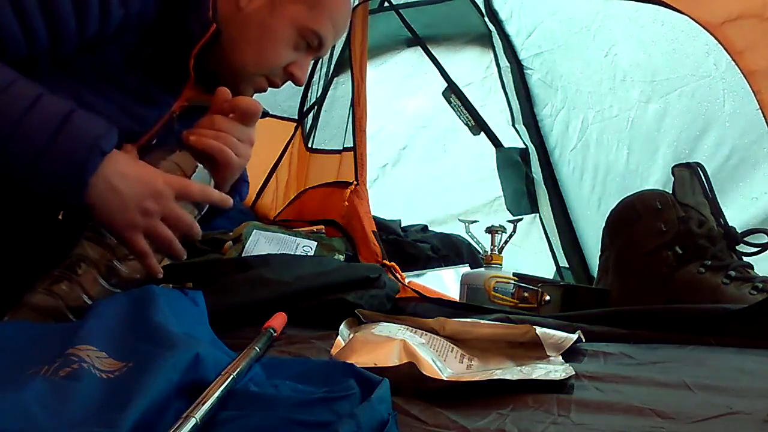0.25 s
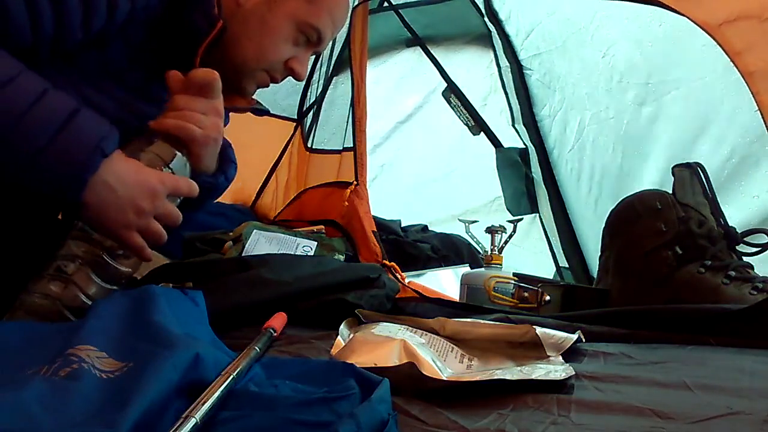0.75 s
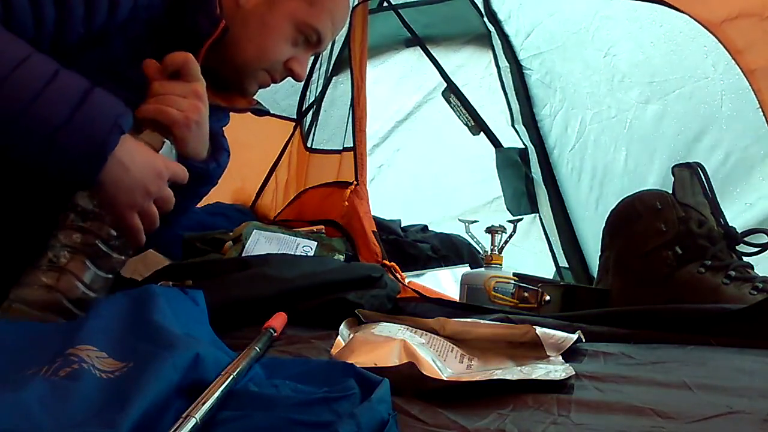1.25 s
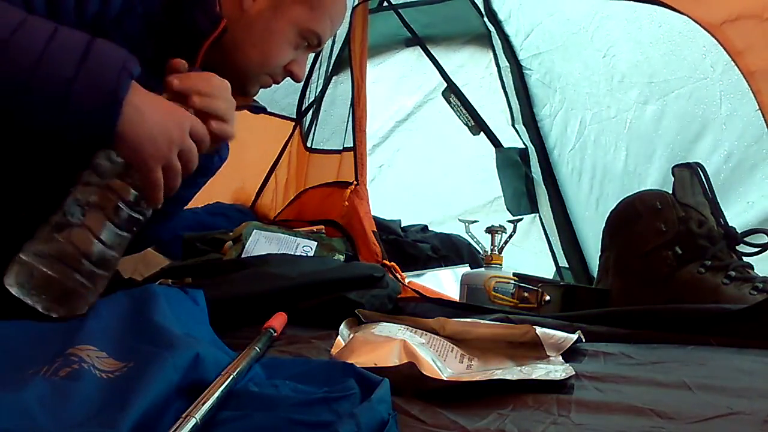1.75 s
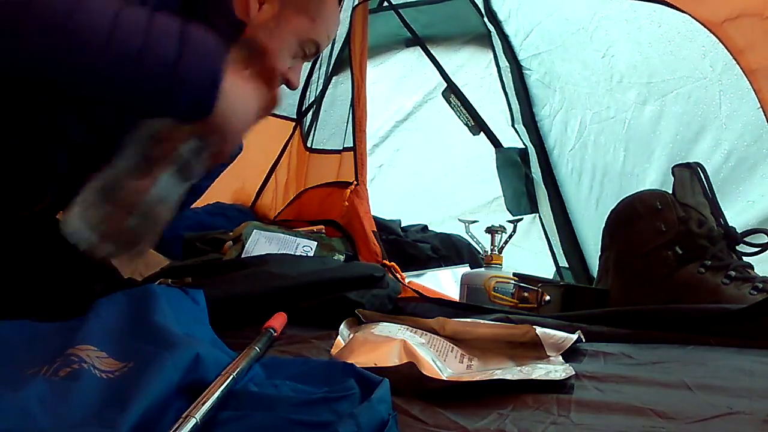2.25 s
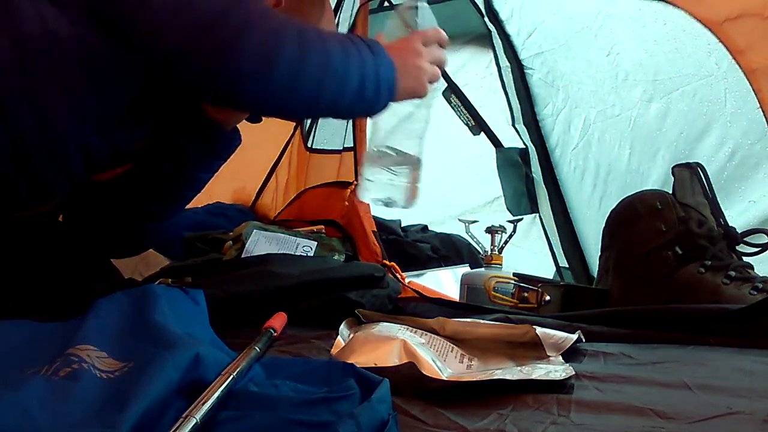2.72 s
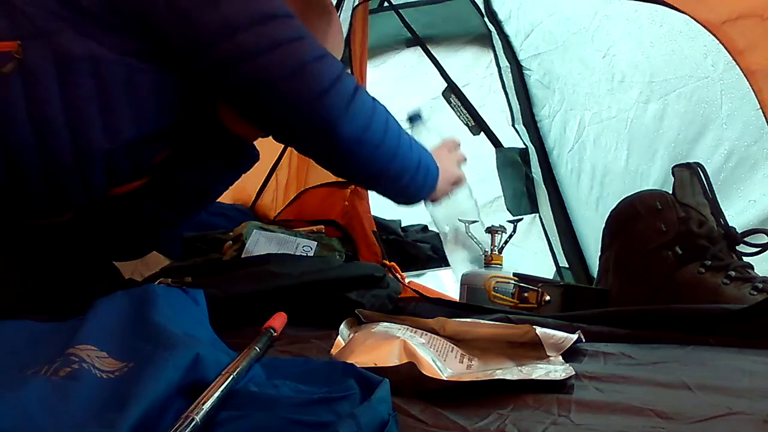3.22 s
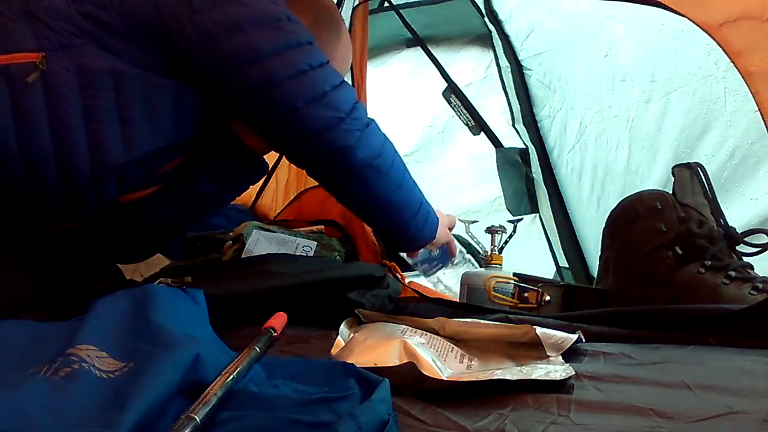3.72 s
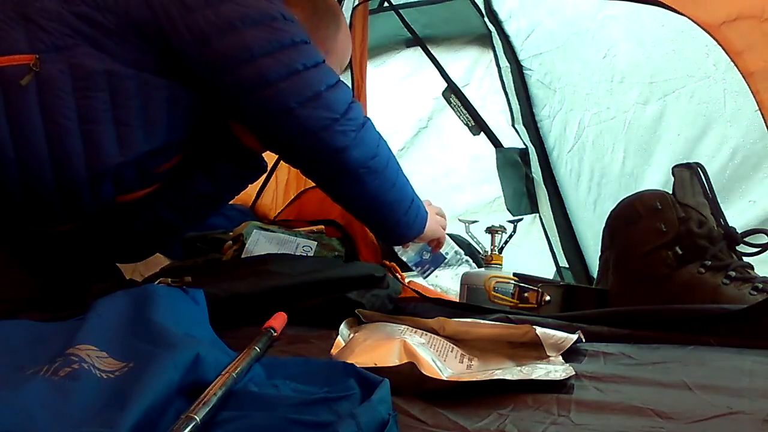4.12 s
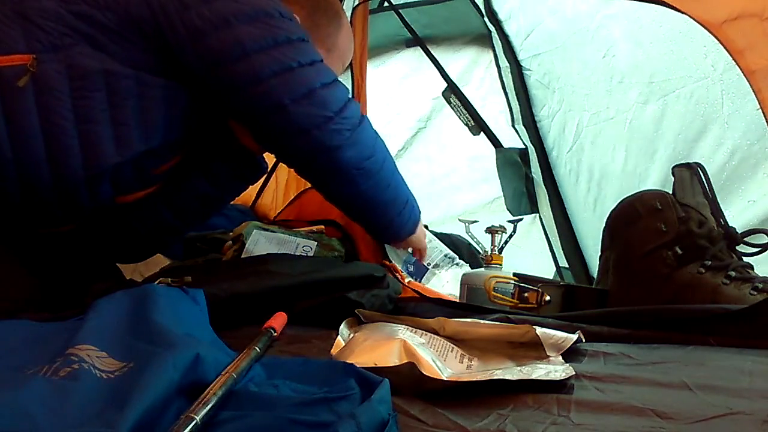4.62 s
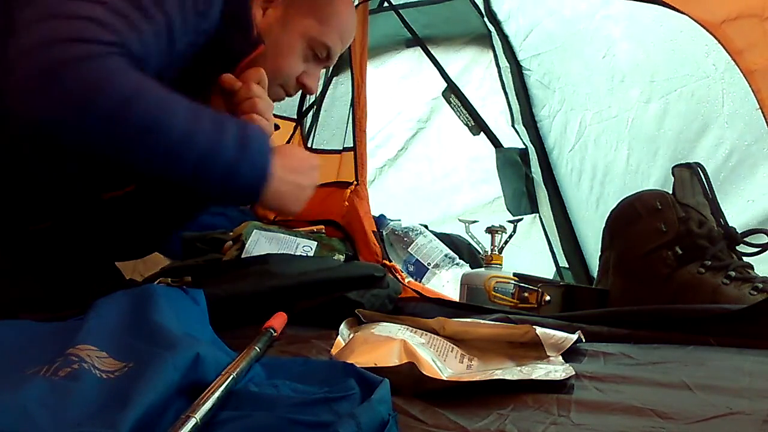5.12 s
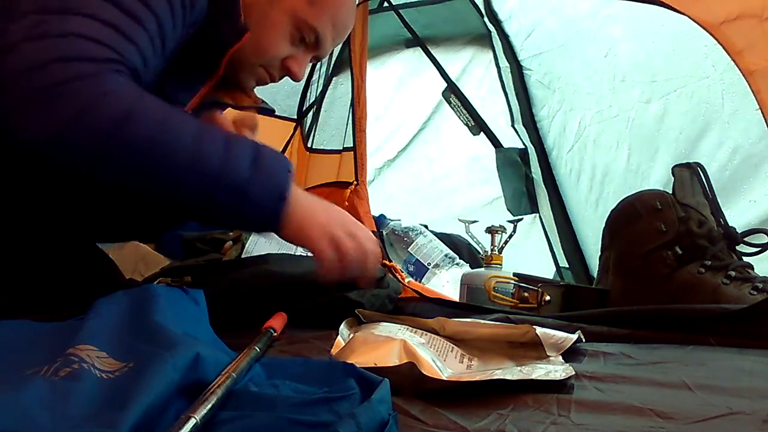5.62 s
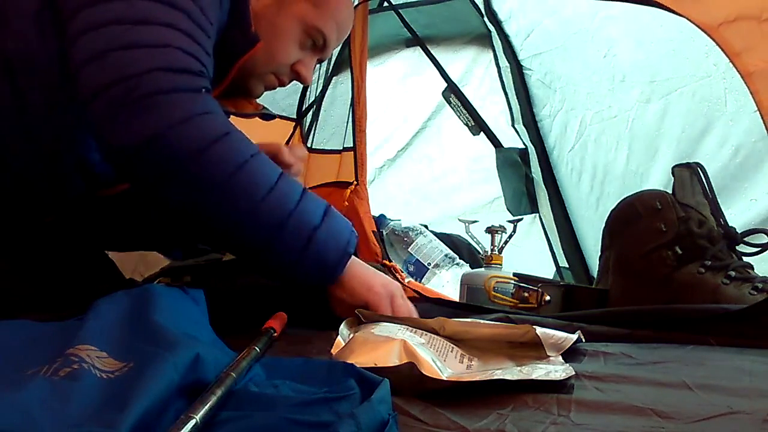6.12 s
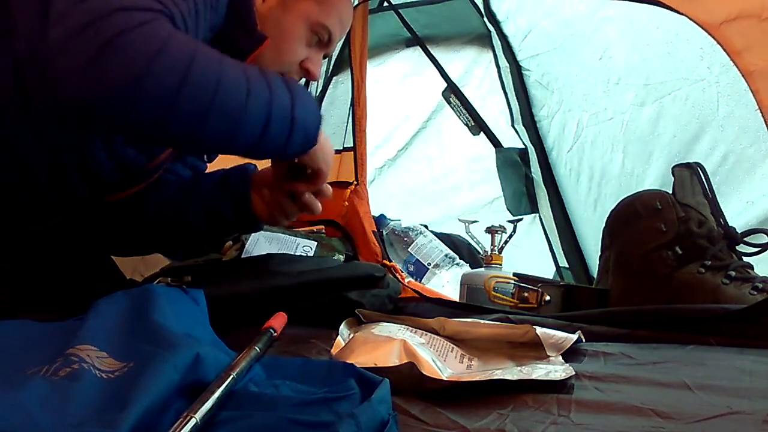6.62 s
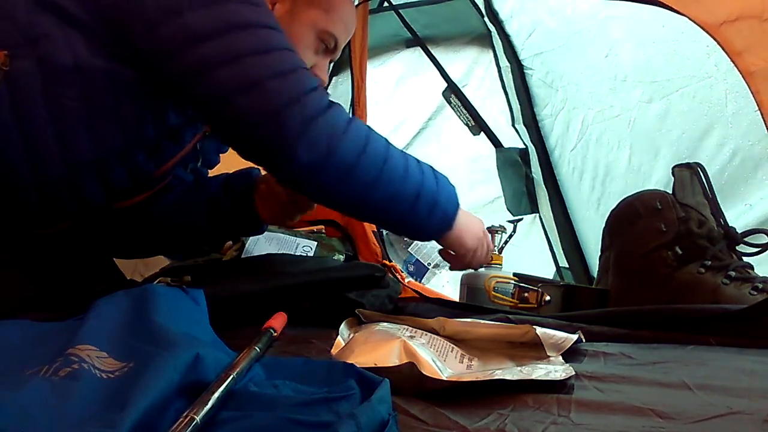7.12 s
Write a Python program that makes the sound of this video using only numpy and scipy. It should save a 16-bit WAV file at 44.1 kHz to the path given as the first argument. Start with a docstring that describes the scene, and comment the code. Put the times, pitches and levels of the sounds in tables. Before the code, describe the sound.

Rain drums unevenly on a tent roof, heard from within by a close stereo microphone, with fat drops plopping overhead over faint hiss. A camper twists and moves a partly filled plastic bottle: two bright snaps with hollow notes, quick nylon swishes and soft thuds, then the strongest crumpling burst as it goes down. Afterwards mostly rain, one short sleeve brush and heavier drops near the end.

```python
"""Rain on a small tent

Rain heard inside a tent by two closely spaced microphone ports: fine drops tick and fat drips plop on
taut fabric, as impulses filtered by damped resonances, over the filtered noise of the far rain.
A camper in a nylon jacket closes a thin plastic water bottle and sets it down by the stove: its wall
buckles with sharp cracks that ring its modes, and the sleeves swish as bursts of bright noise."""
import sys
import numpy as np
from scipy import signal
from scipy.fft import rfft, irfft
from scipy.io import wavfile
from scipy.ndimage import uniform_filter1d

SR = 44100
rng = np.random.default_rng(int(sys.argv[2]) if len(sys.argv) > 2 else 0)


def store_wav(level_fs):
    """Save 16-bit WAV to argv[1]."""
    pcm = np.round(np.clip(np.atleast_2d(level_fs), -1, 1) * 32767)
    wavfile.write(sys.argv[1], SR, pcm.T.astype(np.int16))


N = 324576
SIZE = 4096   # samples in one short sound
AGE = np.arange(SIZE) / SR
TIME = np.arange(N) / SR

# strength of the shower, which drives hiss, ticks and patter: t/s, level/dB
SHOWER = [(0.0, -53.5), (1.27, -52), (1.56, -53.5), (1.82, -50.5), (2.19, -53), (2.48, -52.5),
          (2.81, -57.5), (3.42, -53), (4.39, -55.5), (4.96, -58.5), (5.37, -59), (5.58, -54), (5.86, -53.5),
          (6.17, -52.5), (6.31, -55.5), (7.13, -54.5), (7.28, -56.5), (7.36, -54)]
# the left port hears more of the fabric's middle range: f/Hz, left-right level/dB
PORT_LEAN = [(60, -1), (200, 4), (380, 0.5), (650, 6), (1300, 3), (2400, -2), (4400, -1), (8000, -4.5),
             (15000, 3)]
USUAL_SHOWER_DB = -54
PATTER_FOLLOWS = 0.74   # share of the shower's swing in dB that the patter and the lesser drops take
PORT_LAG_S = 0.000436   # longest delay between the ports
SHIVER_T60_S = 0.026
ROOF_HZ = 926   # plop pitch of the wide roof panel


def from_db(db):
    """Convert level to amplitude: 20 dB is a factor of ten."""
    return 10 ** (np.asarray(db) / 20)


def rms_one(x):
    """Normalize the mean power to one."""
    return x / np.sqrt(np.mean(x ** 2) + 1e-20)


def at_hz(points, hz):
    """Interpolate a spectrum on a log-frequency axis, on which equal steps are equal intervals."""
    known_hz, db = np.transpose(points)
    return np.interp(np.log(hz + 1), np.log(known_hz), db)


def along(curve, s):
    """Interpolate a control curve linearly in time."""
    return np.interp(s, *np.transpose(curve))


def bins(size):
    """Frequencies in Hz of the discrete Fourier transform."""
    return np.arange(size // 2 + 1) * SR / size


def panned(db):
    """Intensity stereo: split a level difference into left and right gains."""
    return from_db(np.array([[.5], [-.5]]) * db)


def add(out, s, sound):
    """Superposition: mix a sound in at a time."""
    start = round(s * SR)
    out[:, start:start + sound.shape[-1]] += sound[..., :N - start]


def resonance(hz, centre_hz, sharpness):
    """Response of a damped resonator: level in dB, 0 at its centre."""
    detuning = (hz + 1) / centre_hz - centre_hz / (hz + 1)
    return -10 * np.log10(1 + (sharpness * detuning) ** 2)


def together(a_db, b_db):
    """Incoherent addition: power sum of two levels."""
    return 20 * np.log10(np.hypot(from_db(a_db), from_db(b_db)))


def causal(db):
    """Minimum-phase response: folding the cepstrum keeps sound from preceding the blow."""
    cepstrum = irfft(db * np.log(10) / 20)
    cepstrum[1:SIZE // 2] *= 2
    cepstrum[SIZE // 2 + 1:] = 0
    return np.exp(rfft(cepstrum))


def all_around(size):
    """Diffuse-field coherence: white noise alike at both ports in the bass, unrelated in the treble."""
    hz = bins(SIZE)
    lags = PORT_LAG_S * np.cos(np.linspace(0, np.pi, 24))
    alike = np.cos(2 * np.pi * np.outer(hz, lags)).mean(1)
    alike = alike * 1.16 / (1 + (hz / 4000) ** 2)
    alike = np.clip(np.interp(bins(size), hz, alike), -1, 1)
    mid, side = rfft(rng.standard_normal((2, size)))
    mid = np.sqrt((1 + alike) / 2) * mid
    side = np.sqrt((1 - alike) / 2) * side
    return irfft(mid + side * [[1], [-1]], size)


def wash(spectrum):
    """Filtered noise: a steady diffuse sound with this spectrum, rms 1."""
    hz = bins(N)
    gains = from_db(at_hz(spectrum, hz)) * panned(at_hz(PORT_LEAN, hz))
    return rms_one(irfft(rfft(all_around(N)) * gains, N))


def flutter(t60):
    """Exponential decay: spectrum of a dying diffuse noise, unit energy."""
    shiver = all_around(SIZE) * from_db(-60 * AGE / max(t60, .002))
    return rfft(rms_one(shiver)) / np.sqrt(SIZE)


def direct(bearing):
    """Interaural-like delay: a click reaches the left port first when the bearing is positive."""
    delay = PORT_LAG_S * (1 + np.array([[-.5], [.5]]) * np.sin(bearing))
    return np.exp(-2j * np.pi * bins(SIZE) * delay)


def splat(grain_hz=450, latest_s=.0024, fade_hz=5000):
    """Group delay: a drop takes a moment to flatten, so spectral parts arrive late, the treble least."""
    hz = bins(SIZE)
    uneven = np.interp(hz / grain_hz, np.arange(128), rng.random(128))
    late_s = latest_s / (1 + hz / fade_hz) * uneven
    return np.exp(-2j * np.pi * np.cumsum(late_s) * hz[1])   # phase is the integral of the delay


def drop(colour_db, lean_db, bearing, shiver_db=-3, tent_db=-11, tent_t60=0.065, sag_hz=450,
         spread_s=0.000584):
    """Impulse response: a click, the shiver of the fabric and a tent tail strongest in the bass."""
    hz = bins(SIZE)
    bass_lift = 1 + 2.5 / (1 + (hz / sag_hz) ** 4)
    tail = from_db(tent_db) * bass_lift * flutter(tent_t60)
    shiver = from_db(shiver_db) * flutter(SHIVER_T60_S)
    # dispersion: ripples carry the highs ahead of the lows, which lag by spread_s at 1 kHz
    ripple = np.exp(-4j * np.pi * spread_s * np.sqrt(1000 * hz))
    blow = (direct(bearing) + shiver + tail) * ripple * splat()
    return irfft(blow * causal(colour_db) * panned(lean_db))


def patter(colour, per_s, size_db, largest, low_hz, high_hz, ring_db, sharpness, shiver_db=-3, count=36):
    """Random point process: uneven taps on spots all around, each resonating at its own pitch; rms 1."""
    out, hz = np.zeros((2, N)), bins(SIZE)
    # each possible tap has a moment and a chance; the rarer it is, the bigger
    taps = rng.random((count, 1000, 2))
    bearings = rng.permutation(np.linspace(0, 2 * np.pi, count, endpoint=False))
    pitches = np.geomspace(low_hz, high_hz, count)
    for bearing, pitch, chances in zip(bearings, pitches, taps):
        tone = at_hz(colour, hz) + together(0, ring_db + resonance(hz, pitch, sharpness))
        lean_db = at_hz(PORT_LEAN, hz) + 4.1 * np.sin(bearing)
        sound = drop(tone, lean_db, bearing, shiver_db=shiver_db)[:, :SIZE // 2]
        share = per_s * N / SR / len(chances) / count
        for when, chance in chances[chances[:, 1] < share]:
            rarity = min(np.log(share / chance), largest)
            add(out, when * TIME[-1], from_db(size_db * rarity) * sound)
    return rms_one(out - out.mean())


def far_rain(swing_db, usual_db=-56.5):
    """Central limit: countless far drops merge into filtered noise that follows the shower."""
    # spectrum of the hiss: f/Hz, spectral level/dB
    hiss_colour = [(15, -32), (25, -1), (43, 7), (80, 9), (293, 3), (560, -4.5), (988, -2), (1520, -20),
                   (2480, -2), (3340, 0), (4610, -5.5), (6380, -8), (12500, -9.5), (14800, -14),
                   (16000, -35)]
    return from_db(usual_db + swing_db) * wash(hiss_colour)


def ticks(swing_db, usual_db=-50.5):
    """Impact excitation: fine drops strike high, sharp resonances of the fabric."""
    # spectrum of a tick: f/Hz, spectral level/dB
    tick_colour = [(60, -13), (250, -3), (700, -4.5), (1500, 1.5), (2400, -2), (4500, -3), (7000, -5.5),
                   (11000, -7.5), (16000, -21)]
    taps = patter(tick_colour, per_s=750, size_db=4.0, largest=3.3, low_hz=1705, high_hz=4940,
                  ring_db=13.0, sharpness=5, shiver_db=3.0)
    return from_db(usual_db + swing_db) * taps


def plops(swing_db, usual_db=-53):
    """Impact excitation: fatter drops strike low resonances, with less swing than the ticks."""
    # spectrum of a plop: f/Hz, spectral level/dB
    plop_colour = [(40, -39), (120, 3), (260, 0.5), (380, 2.5), (540, 0), (720, -1.5), (1000, 2),
                   (1500, -5.5), (3000, -23.5), (8000, -48), (16000, -31)]
    taps = patter(plop_colour, per_s=260, size_db=4.0, largest=2.28, low_hz=261, high_hz=2130,
                  ring_db=9.5, sharpness=4.5)
    return from_db(usual_db + PATTER_FOLLOWS * swing_db) * taps


def draught(level_db=-71, low_hz=35, high_hz=100):
    """Uncorrelated pressure fluctuation: moving air rumbles faintly, on its own at each port."""
    band = signal.butter(2, [low_hz, high_hz], "band", fs=SR, output="sos")
    return from_db(level_db) * rms_one(signal.sosfilt(band, rng.standard_normal((2, N))))


def impacts(drops, level_db=-0.5, bass_db=-14, top_db=-11.0):
    """Damped resonance: thud, hollow plop and splash; slack fabric thuds more and splashes less."""
    out, hz = np.zeros((2, N)), bins(SIZE)
    for s, db, pitch, plop, slack, bearing in drops:
        splash = -13.5 - 0.99 * slack   # dB; slackness soaks up the splash
        blow = [(50, slack + bass_db), (330, slack), (1400, -3.0), (2500, -0.3), (4600, 0.0),
                (8500, splash), (16000, splash + top_db)]
        colour = together(at_hz(blow, hz), plop + 3 * resonance(hz, pitch, 1.5))
        # the roof is louder on the left, the higher panels on the right
        pan = 5 - 4 * np.log2(pitch / ROOF_HZ)
        near = drop(colour, (pan + at_hz(PORT_LEAN, hz)) / 2, bearing, shiver_db=-11)
        add(out, s, from_db(level_db + db) * near)
    return out


def heaviest_drops():
    """Impact excitation: the heaviest single drops overhead, each with its own plop pitch."""
    # t/s, relative impact level/dB, plop f/Hz, plop over impact level/dB,
    # slackness of the fabric level/dB, bearing/rad
    heavy_table = [(0.0371, -14, 3840.0, 6, -4, -0.45), (0.1066, -14, 1040, 9, 3, -0.99),
                   (0.1908, -13.5, 1020, 11, 7, -0.51), (0.2175, -15.5, 2700, 6, -11, -0.58),
                   (0.2834, -10, 1180.0, 0, 4, -0.86), (0.4627, -18, 1090, 14, 1, -0.43),
                   (0.5635, -11, 1070, 11.5, 11.5, -1.06), (0.6195, -13, 2400, 3, -3, 0.46),
                   (0.7518, -12, 1290.0, 7, -4, -1.0), (0.7712, -7.5, 1040, 4, 1, -0.79),
                   (0.8362, -16.5, 5300, 3, -5, -0.3), (1.1204, -12, 2180, 12, -6.0, -0.2),
                   (1.2545, -21, 1130, 15, 1, 0.38), (1.3229, -12.5, 1180.0, 10, 6.5, -1.1),
                   (1.3718, -9.5, 1100, 13, -3, 0.68), (1.3985, -17.5, 1190, 15, 4, -0.31),
                   (1.4882, -9, 1010.0, 3, -6, -0.2), (1.5894, -8, 1130.0, 7, -3, -0.98),
                   (1.6275, -22, 1100, 2, 4, 0.73), (1.683, -10.5, 4500, -8, -7, -0.3),
                   (1.768, -17, 1070, 16.5, 0, 0.2), (1.8674, -18, 1960, 14, -12, 0.021),
                   (1.8841, -14, 1080.0, 15, -1, 0.0), (1.9309, -13.5, 1030.0, 9, -5, -0.42),
                   (1.9378, -9, 1240.0, 5, -3, -0.62), (1.9765, -11, 1000, 6, -2, -0.48),
                   (2.3319, -13.5, 1140, 11, 10, -0.55), (2.383, -8.5, 4180, 0, 1, -1.15),
                   (2.4525, -21, 1000, 6, 11, -0.56), (2.5584, -16.5, 1200, 15.5, 1, -0.45),
                   (2.6215, -20.5, 1200, 14.5, 9, 0.38), (2.674, -13.5, 1040, 11, 2, -0.74),
                   (2.7024, -20, 850.0, 10, 17.5, 0.0), (2.709, -21, 950, 16, 9, 0.52),
                   (2.8075, -18, 1100, 6, -6, -0.59), (2.8225, -16.5, 1000, 8.5, -1, 0.4),
                   (2.859, -18, 1700, 10, 6, -0.2), (2.8746, -9, 4230, -15, -2, -0.35),
                   (2.8925, -10.5, 960, 4, -3, 0.2), (3.0615, -14, 1070, 14, 3, -0.72),
                   (3.6416, -9.5, 1130, 11, 1, 0.26), (3.6691, -9, 1360, 7, 5, -0.8),
                   (3.8288, -16, 1030.0, 8, 13, -0.37), (4.119, -15.5, 1000, 11.5, 2, 0.2),
                   (4.3602, -15, 4200.0, 2, -8, -0.41), (4.429, -15.5, 2500, 0, -5, 0.3),
                   (4.4976, -12, 1030.0, 9, 2, -1.6), (4.569, -14, 1950, 9, -4, -0.5),
                   (4.5786, -11, 1950.0, -3, -6, -0.18), (4.6839, -10, 1250, 11, 3, -0.96),
                   (4.7044, -12, 2760.0, -13, -14, 0.43), (4.7789, -14.5, 900.0, 11.5, 4, -0.27),
                   (4.9495, -26, 2400, 8, -2, -0.16), (5.0175, -21.5, 800, 12, 9, 0.41),
                   (5.0465, -15.5, 1120, 6.5, -2.0, 0.24), (5.2607, -23.5, 2260, 13.5, -1, 0.0),
                   (5.3567, -18, 2360, 10, 7, -0.15), (5.4385, -17, 4230, 8, -6, 0.2),
                   (5.7718, -5.0, 1080.0, 0, -1, -0.81), (5.8574, -16, 1750.0, 12, 9, -0.021),
                   (5.8643, -19, 2150.0, 17, 3, 0.26), (5.9946, -9, 865, 9, 4, 1),
                   (6.0012, -16.5, 960, 16.5, 2, 0.2), (6.0382, -19, 1030.0, 15, 4, 0.31),
                   (6.1435, -18, 1000, 20, 2, 0.0), (6.246, -4, 940, 7, 0, -0.23),
                   (6.308, -16, 950, 9, -2, -0.17), (6.3942, -10, 2720, 3.5, 9, 0.8),
                   (6.4225, -20, 940, 16.5, 12, 0.3), (6.5139, -14, 4010.0, -8, 7, 0.61),
                   (6.523, -14, 1030.0, 15.5, 13, 0.57), (6.533, -10, 1030.0, 10, 0, -1.1),
                   (6.5461, -12.5, 795, 12, 1.5, 0.0), (6.58, -25, 1080.0, 17, 9, -1.2),
                   (6.8323, -10.5, 1180.0, 0, 1, -0.24), (7.0572, -14.5, 1150, 19.5, -10, -0.59),
                   (7.2115, -19, 1000.0, 10.5, 11, 0.15), (7.2993, -8, 2550.0, 3, 1.5, 0.31)]
    return impacts(heavy_table)


def lesser_drops(per_s=20, level_db=-21.5, spread_db=2.5, plop_db=11, slack_spread_db=3):
    """Random point process: middling drops, heavier with the shower, on the roof or small taut panels."""
    roof_share, taut_hz, pitch_spread_oct = .8, 2660, 0.2
    rows = []
    for moment, panel, *chance in rng.random((round(per_s * TIME[-1]), 7)):
        # uniform draws with unit standard deviation
        size, detune, ring, slack, bearing = np.sqrt(3) * (2 * np.array(chance) - 1)
        s = moment * TIME[-1]
        swing_db = along(SHOWER, s) - USUAL_SHOWER_DB
        db = level_db + spread_db * size + PATTER_FOLLOWS * swing_db
        panel_hz = ROOF_HZ if panel < roof_share else taut_hz
        pitch = panel_hz * 2 ** (pitch_spread_oct * detune)
        rows.append((s, db, pitch, plop_db + spread_db * ring, slack_spread_db * slack, bearing))
    return impacts(rows)


def rustle(rest_db=-1):
    """Friction noise: nylon slides on nylon in tiny bright grains, with short swishes of the sleeves."""
    # the jacket rustles as the arms move: t/s, relative level/dB
    arm_motion = [(0, -62), (0.2, -56.5), (1.15, -53), (1.9, -82), (2.5, -59.5), (3.1, -59.5), (4.5, -63),
                  (5.2, -68.5), (5.7, -56), (6.2, -72), (6.6, -106), (7.36, -51)]
    # a sleeve brushes the jacket: t/s, level/dB, standard deviation of the Gaussian swell/s
    sleeve_strokes = [(0.206, -44, 0.013), (2.212, -47, .006), (2.424, -39, 0.0045), (2.485, -49, 0.028),
                      (2.604, -43.5, 0.0039), (2.909, -45, 0.0041), (3.005, -50, 0.027),
                      (3.056, -44, 0.0057), (3.251, -47, 0.012), (3.428, -46, 0.0066),
                      (3.649, -43.5, 0.0097), (5.397, -41, 0.0018)]
    # spectrum of the nylon: f/Hz, spectral level/dB
    nylon_colour = [(200, -33), (2000, -16), (5000, -2), (8000, -5.5), (12000, -4.5), (16000, -12.5)]
    strokes = np.zeros(N)
    for s, db, width in sleeve_strokes:
        strokes += from_db(db) * np.exp(-.5 * ((TIME - s) / width) ** 2)
    grains = patter(nylon_colour, per_s=430, size_db=11, largest=2.6, low_hz=3500, high_hz=12000,
                    ring_db=23, sharpness=1.7, count=16)
    return from_db(along(arm_motion, TIME) + rest_db) * grains + strokes * wash(nylon_colour)


def bumps(t60=0.029, rise_s=0.0046):
    """Heavily damped oscillation: hands, knees and elbows thud softly on bottle and ground sheet."""
    # t/s, relative level/dB, f/Hz
    thuds = [(0.562, -37, 69.6), (0.785, -35, 110), (1.769, -42, 79), (2.177, -33, 129),
             (2.429, -32.5, 152), (2.745, -37, 104), (6.314, -40, 66), (6.681, -34, 144)]
    out = np.zeros((2, N))
    for s, db, hz in thuds:
        envelope = from_db(db - 60 * AGE / t60) * (1 - np.exp(-AGE / rise_s))
        add(out, s, envelope * 2 * np.sin(2 * np.pi * hz * AGE))
    return out


def buckle(colour_db, run_s, t60, swell_s=0.00097, tent_db=-14, tent_t60=0.087):
    """Snap-through buckling: a running fold crackles, stops quickly and leaves a tail in the tent."""
    envelope = (1 - np.exp(-AGE / swell_s)) * from_db(-60 * np.maximum(AGE - run_s, 0) / t60)
    crackle = rfft(all_around(SIZE) * envelope)
    # flatten the smoothed spectrum so that the crackle drives all pitches evenly
    uneven_db = 10 * np.log10(uniform_filter1d(abs(crackle) ** 2, size=24, axis=1) + 1e-12)
    crackle = crackle * np.array([causal(-port) for port in uneven_db])
    return irfft((crackle + from_db(tent_db) * flutter(tent_t60)) * causal(colour_db))


def wall_ring(wall_hz):
    """Modal superposition: level in dB that the narrow modes of the wall add to a crack."""
    # multiple of the wall pitch, level/dB
    ring_modes = [(1, 3), (1.23, 2.5), (1.59, 5.5), (2.02, 4.5), (2.76, 2.5)]
    hz = bins(SIZE)
    ring_db = -4   # between the modes
    for multiple, db in ring_modes:
        ring_db = together(ring_db, db + resonance(hz, multiple * wall_hz, 20))
    return ring_db


def body_ring(body_hz, body_db, off_centre_db=9):
    """Modal excitation: a jolt rings the water-filled body, most in the modes near body_hz."""
    # the bottle with its water and air: f/Hz, relative level/dB, t60/s
    body_modes = [(187.5, -40, 0.089), (253, -39, 0.078), (330, -48.5, 0.1), (457, -37, 0.062),
                  (730, -37, 0.012), (886, -35, 0.023)]
    body = 0
    for mode_hz, mode_db, ring_s in body_modes:
        # the place of the fold favours some modes; the loss is in dB per octave
        jolt_db = body_db - off_centre_db * abs(np.log2(mode_hz / body_hz))
        decay = from_db(mode_db + jolt_db - 60 * AGE / ring_s)
        body = body + decay * np.cos(2 * np.pi * mode_hz * AGE)
    return body


def bottle(body_pan_db=2.5, wall_pan_db=6):
    """Snap-through and modal ringing: the wall cracks and shivers and jolts the body, which rings low."""
    # the wall creaks and buckles: t/s, relative level/dB, run of the fold/s, ring t60/s, wall f/Hz,
    # bite level/dB, brightness level/dB, most jolted body f/Hz, body level/dB, left-right level/dB
    folds = [(0.7869, 10.5, 0.0012, 0.024, 3080, -1, -2, 182, -3.5, -5),
             (2.169, -8, 0.0018, 0.03, 1930, -2, -3, 330, -14, -4),
             (2.1737, 10.5, 0.0031, 0.017, 2610, 3.5, -3, 690, -4, -4),
             (3.822, -9, 0.00088, 0.012, 3220, 2.5, -5.5, 332, -5, -10),
             (3.9655, 7.5, 0.0014, 0.016, 2380, -7, -11, 460, -3, -7),
             (4.015, -7, 0.001, 0.024, 2600, 5, 4, 178, 13, -2),
             (4.0169, 8.5, 0.0026, 0.024, 2340, 1, 4, 210, 0.5, -13),
             (4.0247, 15, 0.0029, 0.012, 2300, 4.5, 2, 266, -1.5, -6),
             (4.033, -11, 0.0059, 0.018, 2570, 7, 13, 466, -11, -4),
             (4.048, -19, 0.0068, 0.015, 2600, 9, 9, 240, -14, 2)]
    # colour of the thin wall: multiple of the wall pitch, level/dB
    wall_colour = [(.03, -29), (.05, -18), (.08, -14), (.19, -8.5), (.33, -7), (.45, -10), (.62, -5.5),
                   (.79, 0), (1, 8), (1.3, 1), (2, 0.5), (2.6, -7.5), (3.4, -6), (4.8, -13.5), (6.5, -30)]
    out, hz = np.zeros((2, N)), bins(SIZE)
    for s, db, run_s, t60, wall_hz, bite_db, bright_db, body_hz, body_db, pan in folds:
        colour = at_hz(np.array(wall_colour) * [wall_hz, 1], hz)
        colour = colour + at_hz([(2600, 0.0044), (4200, bite_db), (8000, bright_db)], hz)
        lean = at_hz([(250, body_pan_db), (950, wall_pan_db), (2400, pan), (7000, pan / 2)], hz)
        ring_db = wall_ring(wall_hz)
        ports = np.array([causal(ring_db + lean / 2), causal(ring_db - lean / 2)])
        wall = irfft(rfft(buckle(colour, run_s, t60)) * ports)
        body = body_ring(body_hz, body_db) * panned(body_pan_db)
        add(out, s, from_db(db) * (wall + body))
    return out


def dents(slide_s=0.0172, rise_s=0.0015):
    """Falling stiffness: a dent gives way with a hollow note that slides down as the wall slackens."""
    # t/s, level/dB, first f/Hz, last f/Hz, t60/s
    hollow_notes = [(0.7879, -24.5, 289, 224, 0.056), (2.1748, -29.5, 540, 225, 0.1)]
    out = np.zeros((2, N))
    for s, db, first_hz, last_hz, t60 in hollow_notes:
        pitch = last_hz + (first_hz - last_hz) * np.exp(-AGE / slide_s)
        envelope = from_db(db - 60 * AGE / t60) * (1 - np.exp(-AGE / rise_s))
        add(out, s, envelope * np.sin(2 * np.pi * np.cumsum(pitch) / SR))
    return out


def scene():
    """Superposition: far rain hisses, near rain ticks and plops, and the camper moves amid it."""
    swing_db = along(SHOWER, TIME) - USUAL_SHOWER_DB
    rain = far_rain(swing_db) + ticks(swing_db) + plops(swing_db)
    overhead = heaviest_drops() + lesser_drops()
    camper = rustle() + bumps() + bottle() + dents()
    return rain + draught() + overhead + camper


def record(dry, ceiling=.85, cutoff_hz=15900):
    """Band limiting and soft saturation: low rumble is cut, peaks are rounded, the top falls steeply."""
    trimmed = signal.sosfilt(signal.butter(2, 36, "high", fs=SR, output="sos"), dry)
    rounded = trimmed / (1 + (trimmed / ceiling) ** 6) ** (1 / 6)
    steep = signal.ellip(12, .1, 80, cutoff_hz, fs=SR, output="sos")
    return signal.sosfilt(steep, rounded)


dry = scene()
out = record(dry)
store_wav(out)
```